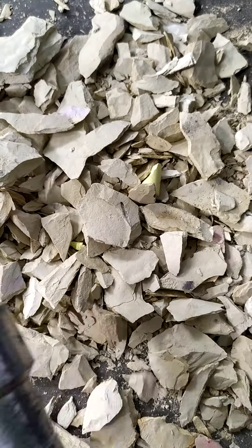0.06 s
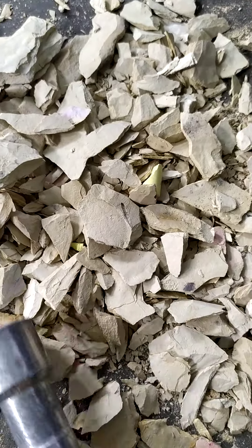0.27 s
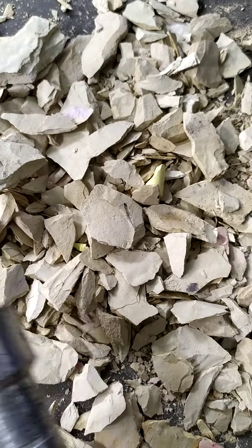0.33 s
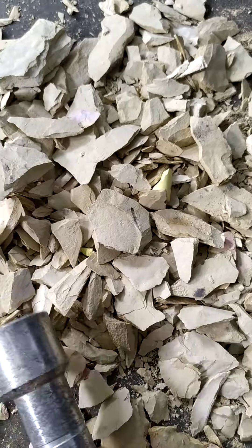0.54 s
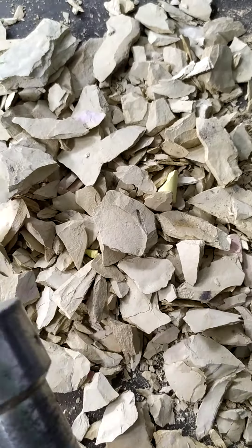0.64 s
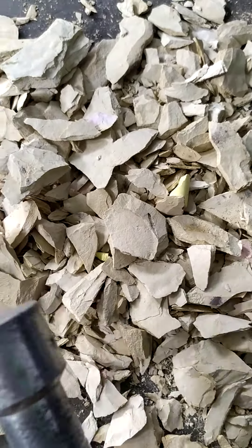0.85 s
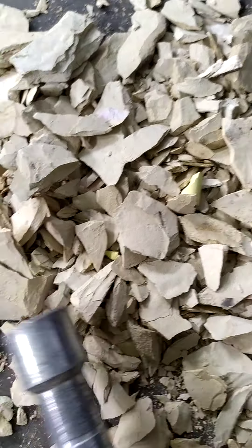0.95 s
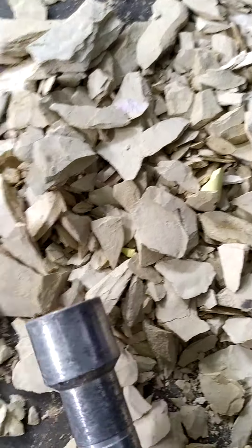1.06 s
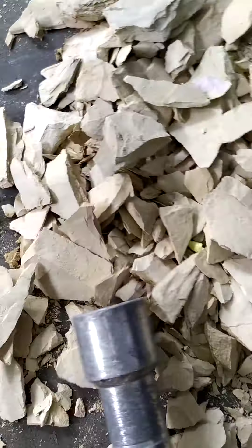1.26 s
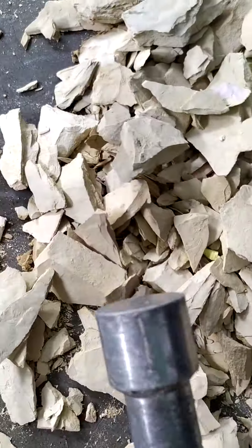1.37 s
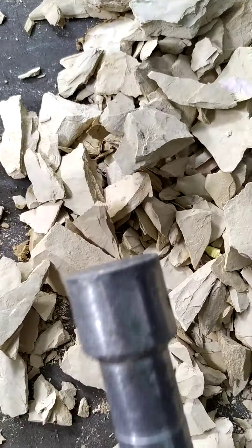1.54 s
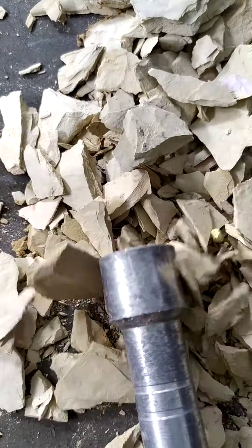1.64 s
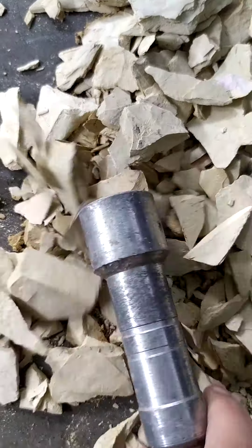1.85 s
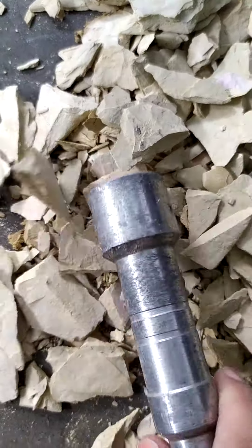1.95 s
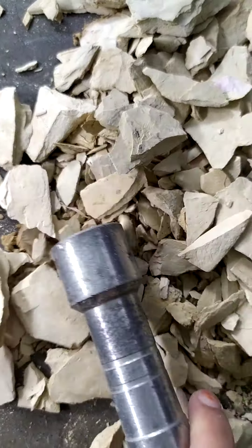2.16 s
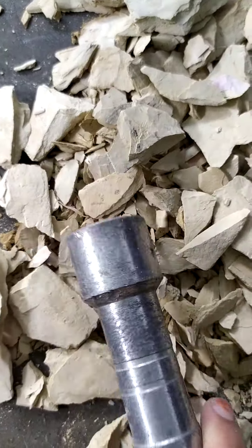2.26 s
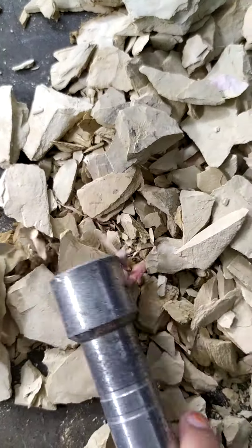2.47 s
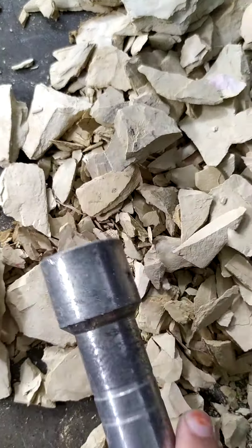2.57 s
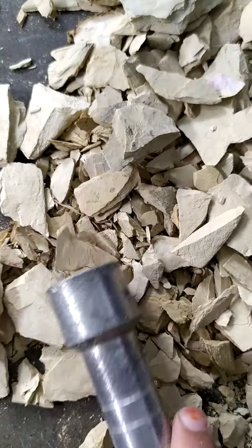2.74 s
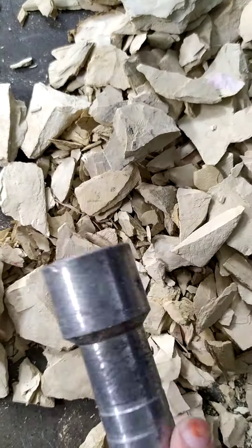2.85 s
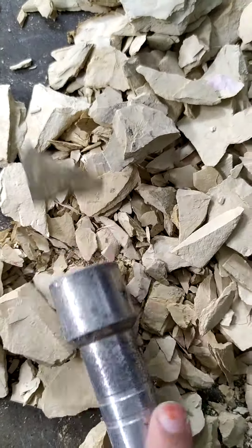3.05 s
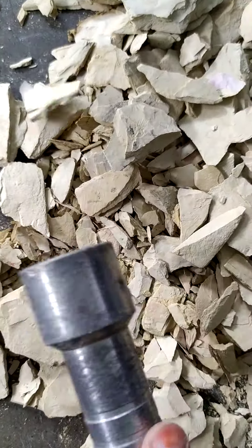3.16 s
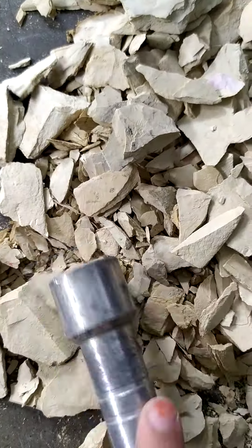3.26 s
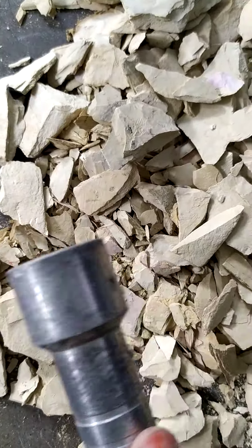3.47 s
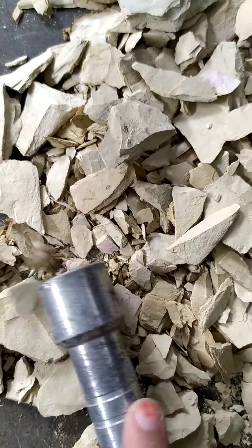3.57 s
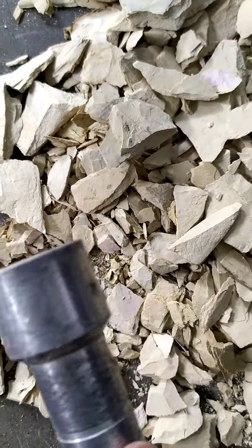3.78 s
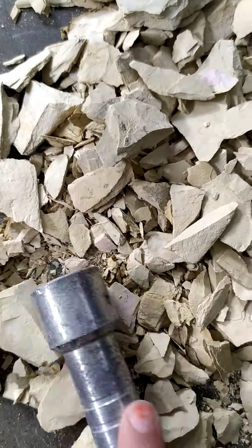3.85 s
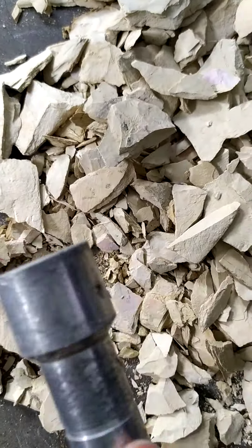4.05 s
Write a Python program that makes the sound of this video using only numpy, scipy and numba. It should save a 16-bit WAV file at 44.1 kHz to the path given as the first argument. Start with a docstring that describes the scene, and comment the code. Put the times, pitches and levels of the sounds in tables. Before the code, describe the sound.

Very close to a phone, a steel hammer breaks dry clay on a table, nearly four crisp blows a second at first. A pause holds only small chip ticks, then blows resume and grow heavier, with deeper table knocks and two crumbling sprays. Soft handling thumps, a short room echo, low rumble, thin whine and an early faint horn surround it.

```python
"""Hammer on dry clay

A steel hand hammer cracks dry clay chunks on a table close to a phone, mostly two to four blows a second with pauses.
Each blow sums excited bodies: fracture snaps, the steel head's modes, ground grit and the table's modes.
Crumbs spray as noise and pings, chips slide and tick, and the hand slips on the phone in soft thumps.
Room echoes, rumble and an appliance's whine lie behind; a far horn buzzes at first. A limiter holds loud peaks."""
import sys
import numpy as np
from scipy import signal
from scipy.fft import rfft, irfft, next_fast_len
from scipy.io import wavfile
from scipy.ndimage import uniform_filter1d
from numba import njit

SR = 44100
rng = np.random.default_rng(int(sys.argv[2]) if len(sys.argv) > 2 else 0)


def dump_mix(stems):
    """Bounce the given channels to the path in sys.argv[1] as a 16-bit WAV at rate SR."""
    frames = np.atleast_2d(stems).T  # one column per channel
    limited = np.clip(frames, -1, 1)  # hard clip at full scale
    pcm = np.round(limited * 32767).astype(np.int16)
    wavfile.write(sys.argv[1], SR, pcm)


N = 309582
TOP_HZ = 15500  # upper limit of crumb pitches and of the phone's passband
T = np.arange(N) / SR  # s
HIT = T[:4096]  # time axis of one short sound, s
HIT_WINDOW = int(0.012 * SR)  # reference length for the level of a short sound, samples


def undb(db):
    """Decibels to amplitude ratio."""
    return 10 ** (np.asarray(db) / 20)


def unit(x):
    """Normalise mean power: scale to rms 1."""
    return x / np.sqrt(np.mean(x ** 2))


def unit_hit(x):
    """Normalise energy: scale a short sound to the energy of 12 ms at rms 1."""
    return x * np.sqrt(HIT_WINDOW / np.sum(x ** 2))


def along(points, hz):
    """Interpolate (frequency_hz, value) points on a logarithmic frequency axis."""
    point_hz, value = np.transpose(points)
    return np.interp(np.log(hz + 1), np.log(point_hz), value)


def shape(x, gain):
    """Linear filtering: multiply the spectrum by a gain given as a function of frequency."""
    n = x.shape[-1]
    size = next_fast_len(n + 2048)
    spectrum = rfft(x, size) * gain(np.fft.rfftfreq(size, 1 / SR))
    return irfft(spectrum, size)[..., :n]


def resonance(f, hz, width):
    """Damped resonance: response 1 at its centre, with a half-power width in Hz."""
    return 1j * f * width / (hz ** 2 - f ** 2 + 1j * f * width)


def walk(rate):
    """Smoothed random process: a wander of spread near 1 with rate new values a second."""
    k = int(SR / rate)
    steps = np.repeat(rng.standard_normal(N // k + 1), k)
    return 1.116 * uniform_filter1d(uniform_filter1d(steps, k), k)[:N]


def add(out, s, x):
    """Superposition: add a sound to the stereo track, starting at s seconds."""
    i = max(int(s * SR), 0)
    x = x[..., :N - i]
    out[:, i:i + x.shape[-1]] += x


def ring(modes, scatter_db=0.95, detune=0.03, wave=np.sin):
    """Modal decay: struck modes whose strength and pitch vary a little with the point of contact."""
    hz, db, t60_s = np.transpose(modes)[:, :, None]
    size, tune = rng.standard_normal((2, len(modes), 1))
    envelope = undb(db + scatter_db * size - 60 * HIT / t60_s)
    return np.sum(envelope * wave(2 * np.pi * hz * (1 + detune * tune) * HIT), axis=0)


# hammer blows: start_s, knock_db (on the table), steel_db, grit_db (under the head), crack_db, pitch_hz (crack),
# splinter_db (re crack, before a 4 dB cut), chunk_db (ring re crack body), crack_s (fracture time), room_db
STRIKES = [ (0.038, -29, -20.5, -35.5, -16.5, 4000, -4.5, -32, 0.0028, 0),
           (0.2994, -26, -25.5, -41, -22, 4840, 8.5, -35, 0.001, -1.5),
           (0.5646, -25, -35.5, -37, -34.5, 5560, -2.5, -22, .0014, 0),
           (0.8236, -26.5, -33.5, -39, -27.5, 5430, -0.5, -33, 0.0011, -4),
           (1.077, -19.5, -26.5, -39, -18, 6500, -10, -14, 0.0012, -2.5),
           (1.3453, -24.5, -28, -34, -23, 6440, -8, -14, 0.0018, -4.5),
           (2.251, -31.5, -33.5, -38, -30, 6140, -0.5, -29, 0.0014, 1),
           (2.538, -28.5, -31, -36, -22, 5500, -6, 2, 0.0011, -4),
           (2.8248, -19.5, -30.5, -34.5, -22, 6260, -1, 3, 0.001, -4),
           (2.8558, -33, -42, -38, -29.5, 5500, -19, -4, 0.002, -2),
           (3.0906, -20.5, -29, -28, -10.5, 6150, -45, 9, 0.0023, -0.5),
           (3.3625, -21, -34.5, -30.5, -23.5, 7760, -22, -13, .0014, -1),
           (3.649, -21, -27.5, -51, -32, 4870, -1.5, -5, .0014, -2),
           (3.9352, -19.5, -48, -26, -19, 5830, -25, -5, 0.00091, 0),
           (4.216, -13, -12, -43, -26, 4400, -13, 8, 0.0014, -3),
           (4.496, -13.5, -22.5, -46, -34.5, 4530, -9, 20, .0012, -4.5),
           (4.513, -19, -39, -45, -48, 4800, -2, -10, 0.0012, -6),
           (5.131, -10, -16.5, -24, -19.5, 6250, -27, 24, 0.0012, -0.5),
           (5.6806, -20, -44, -45, -10, 4500, -1.5, -17, .0016, -0.5),
           (5.6896, -19, -53, -45, -32, 6050, -7, -15, .0014, 2.5),
           (6.203, -18.5, -17.5, -17.5, -18.5, 6400, -12, 13, 0.0011, -1),
           (6.758, -35.5, -43.5, -55, -39.5, 4900, -3, -19, 0.0025, 7)]
# chips tipping against each other and the hammer: start_s, level_db, pitch_hz, steel_db
TICKS = [(.154, -44.5, 6200, -67), (.224, -42.5, 5800, -60), (.313, -35, 6860, -64),
         (0.5978, -37, 3760, -43), (1.682, -38.5, 6350, -43), (1.954, -35, 5340, -45),
         (2.02, -44.5, 6000, -65), (2.053, -44, 5800, -65), (2.132, -45, 6000, -65), (3.27, -48, 6200, -65),
         (4.061, -53, 7000, -65), (6.486, -39.5, 1580, -63), (6.52, -52, 2700, -44.5),
         (6.931, -52, 6500, -62)]
# chunks that shatter and spray crumbs over the pile: start_s, level_db, pitch_hz, decay_s
SPRAYS = [(5.136, -30.5, 3300, 0.051), (5.684, -25, 6850, 0.04)]
SLIDE_S, SLIDE_DB = 0.0049, -4.5  # a chip slides this long before it lands; level re its tick
STEEL_ROOM_DB = -1.5  # steel level sent to the room re the near sound
WALL_DELAYS_S = (0, 0.0013, 0.0029, 0.0041, 0.0059, 0.0073)


def hammering():
    """Direct and reverberant fields: blows, ticks and sprays near by, blows and ticks also through the room."""
    near, sent = np.zeros((2, N)), np.zeros((1, N))
    for s, knock_db, steel_db, *clay, room_db in STRIKES:
        direct = blow(knock_db, steel_db, *clay)
        add(near, s, ports(direct, 1 + 0.28 * rng.standard_normal()))
        # each wall hears its own random version, so the room's answer is an even wash
        for delay in WALL_DELAYS_S:
            to_wall = blow(knock_db, steel_db + STEEL_ROOM_DB, *clay)
            add(sent, s + delay, undb(room_db) * to_wall / np.sqrt(len(WALL_DELAYS_S)))
    for s, db, hz, steel_db in TICKS:
        tick = chip(db, hz) + undb(steel_db) * unit_hit(steel_head(detune=0.003))
        add(near, s, ports(tick, 1 + 0.13 * rng.standard_normal()))
        add(near, s - SLIDE_S, ports(slide(db, hz)))
        add(sent, s, tick)
    for s, db, hz, decay_s in SPRAYS:
        add(near, s, spray(db, hz, decay_s))
    return near + room(sent[0])


# a harder blow drives through the clay to the table: the contact shortens and the knock brightens
PUSH_HZ, PUSH_AT_DB, PUSH_DB_PER_OCTAVE, PUSH_TOP_HZ = 574, -18.5, 0.5, 5000
TABLE_LOW_HZ, HEAD_LOW_HZ, CLAY_LOW_HZ = 78.5, 1620, 2100  # each body radiates little below this, by its size
# powder ground between the steel face and the chunk; the width is that of one of three resonances in series
GRIT_HZ, GRIT_WIDTH_HZ, GRIT_S = 2960, 3350, 0.002


def blow(knock_db, steel_db, grit_db, crack_db, hz, splinter_db, chunk_db, crack_s):
    """Impact excitation: one blow drives table, steel, clay and grit; a weaker knock has a duller push."""
    push_octaves = (knock_db - PUSH_AT_DB) / PUSH_DB_PER_OCTAVE
    push_hz = min(PUSH_HZ * 2 ** push_octaves, PUSH_TOP_HZ)
    knock = shape(table_top(), lambda f: 1 / (1 + 1j * f / push_hz) * (1j * f / (TABLE_LOW_HZ + 1j * f)) ** 2)
    recoil = -shape(steel_head(detune=0.0014), lambda f: (1j * f / (HEAD_LOW_HZ + 1j * f)) ** 2)
    clay = crack(hz, chunk_db, splinter_db, crack_s)
    clay = shape(clay, lambda f: f ** 4 / (f ** 4 + CLAY_LOW_HZ ** 4))
    powder = rng.standard_normal(len(HIT)) * np.exp(-HIT / GRIT_S)
    grit = shape(powder, lambda f: resonance(f, GRIT_HZ, GRIT_WIDTH_HZ) ** 3)
    out = undb(knock_db) * unit_hit(knock) + undb(steel_db) * unit_hit(recoil)
    return out + undb(grit_db) * unit_hit(grit) + undb(crack_db) * clay


def crack(hz, ring_db, splinter_db, length):
    """Brittle fracture: tiny snaps, one clean break and sparser crumbs ring the chunk and its splinters."""
    noise, size, crumb_noise, crumb_size = rng.standard_normal((4, len(HIT)))
    running = np.exp(-HIT / (1.74 * length)) * (1 - np.exp(-HIT / 0.0001))
    burst = unit_hit(noise * undb(size) * running)
    crumbling = unit_hit(crumb_noise * undb(2 * crumb_size) * np.exp(-HIT / 0.012))
    clean_break = rng.choice([-1, 1]) * unit_hit(np.arange(len(HIT)) == int(0.0007 * SR))
    snaps = burst + undb(-3) * clean_break + undb(-17) * crumbling
    body = shape(snaps, lambda f: resonance(f, hz, hz) ** 2 * resonance(f, 3500, 7300))
    chunk = shape(snaps, lambda f: resonance(f, hz, 380))
    splinters = shape(snaps, lambda f: resonance(f, 12000, 5900) ** 3)
    clay = unit_hit(unit_hit(body) + undb(ring_db) * unit_hit(chunk))
    return clay + undb(splinter_db - 4.0) * unit_hit(splinters)


# modes of the hammer head: frequency_hz, level_db (relative), t60_s
STEEL = [(2909, 30, 0.038), (2935, 1, 0.37), (2700, 1, 0.015), (4600, -8, 0.013), (8120, 9, 0.047)]


def steel_head(detune):
    """Free vibration of a solid: the struck head rings in its own modes."""
    return ring(STEEL, detune=detune)


# clear modes of the table: frequency_hz, level_db (relative), t60_s
TABLE_MODES = [(184.9, 0.5, 0.13), (276.4, -1.5, 0.083), (454, -0.5, 0.036), (547, -10, 0.019),
               (790, -9, 0.055), (1152, -1.5, 0.056), (1423, -1.5, 0.031), (2000, -7, 0.022),
               (2080, 7.5, 0.016), (2340, 12.5, 0.0073)]
DENSE_DB, DENSE_S = -9, 0.006  # the table's many crowded modes re its clear ones, and their decay
CONTACT_DB, TABLE_TOP_HZ = 1.5, 2950  # bare thud of contact re the modes; the table radiates little above this


def table_top():
    """Plate response to an impulse: a bare thud, clear modes and a wash of crowded ones."""
    wash = rng.standard_normal(len(HIT)) * np.exp(-HIT / DENSE_S)
    dense = shape(wash, lambda f: resonance(f, 1270, 2100))
    modes = ring(TABLE_MODES, detune=0.019, wave=np.cos)
    board = undb(CONTACT_DB) * unit_hit(HIT == 0) + unit_hit(modes) + undb(DENSE_DB) * unit_hit(dense)
    return signal.sosfilt(signal.butter(4, TABLE_TOP_HZ, fs=SR, output="sos"), board)


TICK_S, TICK_RING_DB = 0.003, -29  # fracture time of a tick; ring of the chip re the tick's body
# smaller, higher chips splinter more (level re the tick, before a 4 dB cut)
TICK_SPLINTER_DB, TICK_SPLINTER_AT_HZ, SPLINTER_DB_PER_OCTAVE = -4, 5000, 4


def chip(db, hz):
    """Small-body impact: a loose chip tips over with a short scraping tick."""
    splinter_db = TICK_SPLINTER_DB + SPLINTER_DB_PER_OCTAVE * np.log2(hz / TICK_SPLINTER_AT_HZ)
    return undb(db) * unit_hit(crack(hz, TICK_RING_DB, splinter_db, TICK_S))


def slide(db, hz):
    """Friction noise: a faint scrape swells just before a chip lands."""
    age = HIT / SLIDE_S
    scrape = rng.standard_normal(len(HIT)) * age * np.exp(-age ** 2)
    return undb(db + SLIDE_DB) * unit_hit(shape(scrape, lambda f: resonance(f, hz, 1.6 * hz) ** 3))


SPRAY_RISE_S, SPRAY_GRAIN_DB = 0.0059, 8.5  # flight time of the first crumbs; spread of dust grain sizes
CRUMB_DB, CRUMB_S = -7.5, 0.00058  # coarse crumbs re the fine dust; their ring time
CRUMB_REACH_OCTAVES = 1.02  # crumb pitches reach this far up and down


def spray(db, hz, decay_s):
    """Granular impact noise: dense fine dust that thins out, and coarse crumbs, to either side."""
    t = T[:SR // 4]
    noise, size = rng.standard_normal((2, 2, len(t)))
    thinning = np.exp(-t / decay_s) * (1 - np.exp(-t / SPRAY_RISE_S))
    grains = noise * undb(SPRAY_GRAIN_DB * size) * thinning
    dust = shape(grains, lambda f: resonance(f, hz, 1.5 * hz) ** 3)
    debris = unit_hit(dust) + undb(CRUMB_DB) * unit_hit(crumbs(t, hz, decay_s))
    return undb(db) * np.sqrt(2) * debris  # the root shares the energy over two channels


def crumbs(t, hz, decay_s, count=60):
    """Random arrivals: coarse crumbs land one by one, each a tiny ping of its own size, pitch and side."""
    when, size, pitch, side = rng.random((count, 4)).T[:, :, None]
    lands_s = SPRAY_RISE_S - decay_s * np.log(1 - when)
    age = np.maximum(t - lands_s, 0)
    ping_hz = np.minimum(hz * 2 ** (CRUMB_REACH_OCTAVES * (2 * pitch - 1)), TOP_HZ)
    envelope = undb(-14 * size) * np.exp(-lands_s / (2 * decay_s) - age / CRUMB_S)
    pings = envelope * np.sin(2 * np.pi * ping_hz * age)
    return np.array([np.sum(pings * np.sqrt(share), axis=0) for share in (side, 1 - side)])


# phase between the two microphone ports: frequency_hz, left_lead_rad
PORT_PHASE = [(100, -0.5), (1500, 1.05), (2950, 1), (4200, 2.5), (6500, 5), (10000, 15.5), (16000, 30)]
# level between the two ports: frequency_hz, left_minus_right_db
PORT_BALANCE = [(150, 0), (300, 5.5), (700, 3), (1400, -5.5), (2800, 1), (4500, 7), (8000, -0.5),
                (13000, 1)]


def ports(x, turn=1):
    """Interaural-like differences: phase and level split over two ports; turn scales phase with direction."""
    sides = np.array([[1], [-1]]) / 2

    def port_gain(f):
        phase = np.exp(1j * sides * turn * along(PORT_PHASE, f))
        return phase * undb(sides * along(PORT_BALANCE, f))
    return shape(x, port_gain)


# decay of the room: frequency_hz, t60_s (a negative time swells instead of decaying)
ROOM_T60 = [(150, -0.2), (800, 0.43), (3000, 0.4), (7000, 0.25), (15000, 0.47)]
# strength of the room: frequency_hz, level_db
ROOM_GAIN = [(150, -8), (400, -3), (900, -5), (2000, -22), (3000, -18), (5000, -19.5), (8000, -14),
             (15000, -18.5)]
ECHO_S, ECHO_DB, BUILD_S = 0.015, -19, 0.0088  # delay and level of the wall's echo; build-up of the tail


def room(x):
    """Reverberation: a near wall's echo and a diffuse half-second tail, whose lowest bands swell until its end."""
    t = T[:SR // 2]
    centres = np.geomspace(100, 16000, num=15)  # Hz
    noise = rng.standard_normal((2, len(t)))
    tail = 0
    for hz, pick in zip(centres, np.eye(len(centres))):
        band = shape(noise, lambda f: along(np.c_[centres, pick], f))
        fade = undb(-60 * t / along(ROOM_T60, hz)) * (1 - np.exp(-(t / BUILD_S) ** 2))
        tail = tail + undb(along(ROOM_GAIN, hz)) * band * fade / np.linalg.norm(fade)
    echo = shape(x, lambda f: np.exp(-2j * np.pi * f * ECHO_S) / (1 + 1j * f / 3500))
    return signal.fftconvolve(x[None], tail, axes=1)[:, :N] + undb(ECHO_DB) * echo


# the hand slips on the phone: start_s, level_db
SLIPS = [(0.27, -23.5), (0.283, -26), (0.367, -24.5), (0.399, -23.5), (.43, -27), (0.441, -28),
         (2.43, -32.5), (2.466, -29), (2.494, -34), (3.548, -29), (5.207, -28.5), (5.251, -30),
         (5.477, -28.5), (6.385, -27), (6.44, -31)]


def bumps(hz=140, width=270, edge_hz=420, length=0.007, pan_db=7, grain_db=3):
    """Structure-borne sound: each slip is a soft, grainy thump through the phone's body, nearer its left port."""
    out = np.zeros((2, N))
    age = HIT / length
    pan = np.array([[pan_db], [-pan_db]]) / 2
    for s, db in SLIPS:
        noise, size = rng.standard_normal((2, len(HIT)))
        rub = noise * undb(grain_db * size) * age * np.exp(-age)
        thump = shape(rub, lambda f: resonance(f, hz, width) ** 2 / (1 + (f / edge_hz) ** 4))
        add(out, s, undb(db + pan) * unit_hit(thump))
    return out


# harmonics of the horn: harmonic_number, level_db (before a 1 dB lift)
HORN = [(1, -50.5), (2, -74), (6, -76), (7, -63), (8, -50.5), (9, -51), (10, -65), (11, -60), (12, -58.5),
        (13, -73)]
HORN_HZ, HORN_ON_S, HORN_OFF_S = 392.3, 0.11, 0.71


def horn(horn_db=1.0, scatter=0.61, flutter_hz=75):
    """Multipath interference: a far diaphragm horn's harmonics flutter as their echoes add and cancel."""
    phase = 2 * np.pi * np.cumsum(HORN_HZ * (1 + 0.0042 * walk(35.7))) / SR
    gate = np.clip((T - HORN_ON_S) / 0.028, 0, 1) * np.exp(-np.maximum(T - HORN_OFF_S, 0) / 0.15)
    out = 0
    for k, db in HORN:
        paths = 1 + scatter * (walk(flutter_hz) + 1j * walk(flutter_hz))
        out = out + undb(db + horn_db) * unit(np.imag(paths * np.exp(1j * round(k) * phase)))
    return gate * out


# harmonics of the appliance's motor: multiple_of_motor_speed, level_db (before the swell)
WHINE = [(46, -56), (98, -62), (102, -69.5), (107, -68), (109, -62), (110, -62)]
# the whine swells in and sinks again: time_s, level_db (added to each harmonic)
WHINE_LEVEL = [(0, -2.5), (1.0, -2), (1.5, 1.5), (5.5, 1), (6.3, -1.5), (7.0, -2.5)]
MOTOR_HZ = 47.385


def whine(drift=0.00027, waver_db=2):
    """Beating: high harmonics of the appliance's motor, whose close neighbours beat into a thin buzz."""
    phase = 2 * np.pi * np.cumsum(MOTOR_HZ * (1 + drift * walk(2.055))) / SR
    swell_db = np.interp(T, *np.transpose(WHINE_LEVEL))
    out = 0
    for k, db in WHINE:
        tone = unit(np.sin(round(k) * phase + 2 * np.pi * rng.random()))
        out = out + undb(db + swell_db + waver_db * walk(24.98)) * tone
    return out


# spectrum of the air noise: frequency_hz, density_db_per_hz (relative)
AIR = [(15, -62), (25, -54), (56, 1.5), (80, -1), (161, -6.5), (212, -14.5), (354, -20.5), (463, -27),
       (796, -31), (1230, -28.5), (2110, -29.5), (2480, -28.5), (5140, -30.5), (6740, -39), (16000, -52.5)]
# correlation of left and right: frequency_hz, likeness (0 to 1)
LIKENESS = [(50, 0.09), (130, 0.97), (290, 0.67), (640, 0.31), (1400, 0), (16000, 0)]
# hollow colours of the background: frequency_hz, width_hz (of one of two resonances in series), level_db
DRONE = [(156.3, 17.5, -41.5), (821, 224, -54.5), (2033, 260, -55.5)]
AIR_DB = -34  # level of the noise before the rumble is lifted
RUMBLE_DB, RUMBLE_START_DB, RUMBLE_SETTLE_S = 1.15, 5, 1  # steady lift; extra lift at first; its decay


def background():
    """Partly coherent noise field: settling rumble and hiss, with the drone and whine of an appliance."""
    mid, side = rng.standard_normal((2, N))
    mid = shape(mid, lambda f: undb(along(AIR, f)) * np.sqrt(1 + np.clip(along(LIKENESS, f), -1, 1)))
    side = shape(side, lambda f: undb(along(AIR, f)) * np.sqrt(1 - np.clip(along(LIKENESS, f), -1, 1)))
    air = undb(AIR_DB) * unit(np.array([mid + side, mid - side]))
    low = shape(air, lambda f: 1 / (1 + (f / 400) ** 4))
    lift_db = RUMBLE_DB + RUMBLE_START_DB * np.exp(-T / RUMBLE_SETTLE_S)
    out = air + low * (undb(lift_db) - 1)
    for hz, width, db in DRONE:
        own, shared = rng.standard_normal((2, N)), rng.standard_normal(N)
        like = np.clip(along(LIKENESS, hz), 0, 1)
        noise = np.sqrt(1 - like) * own + np.sqrt(like) * shared
        out += undb(db) * unit(shape(noise, lambda f: resonance(f, hz, width) ** 2))
    return (out + whine()) * undb(np.array([[0.9], [-0.9]]))  # slightly louder on the left


def scene():
    """Superposition of the hammer at work, the hand on the phone, and the surroundings."""
    return hammering() + bumps() + horn() + background()


@njit
def follow(x, attack, release):
    """Envelope detection: a level that rises fast and falls more slowly."""
    out, e = np.empty(len(x)), 0.
    for i in range(len(x)):
        e += (x[i] - e) * (attack if x[i] > e else release)
        out[i] = e
    return out


def record(dry, ceiling=1.0, attack_s=0.00075, release_s=0.01):
    """Dynamic range limiting: the phone ducks the hardest blows, rounds what is left and cuts the top."""
    attack, release = 1 - np.exp(-1 / (attack_s * SR)), 1 - np.exp(-1 / (release_s * SR))
    peak = follow(np.abs(dry).max(axis=0), attack, release)
    held = dry / np.maximum(peak / ceiling, 1)
    held = held / (1 + (held / 0.7) ** 6) ** (1 / 6)  # soft saturation towards 0.7
    return signal.sosfilt(signal.ellip(8, 0.2, 70, TOP_HZ, fs=SR, output="sos"), held)


dry = scene()
out = record(dry)
dump_mix(out)
```